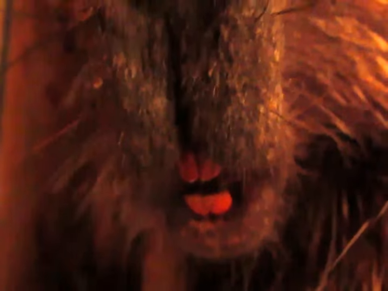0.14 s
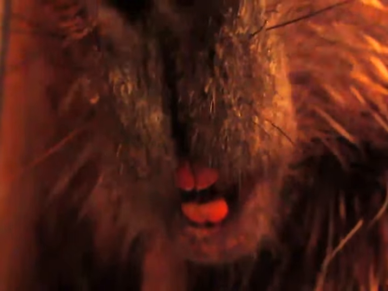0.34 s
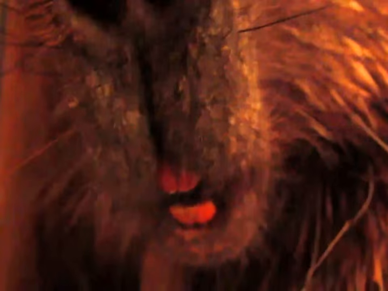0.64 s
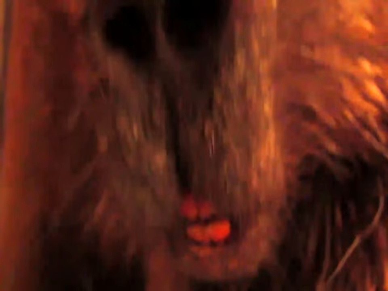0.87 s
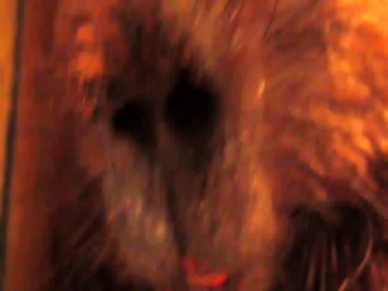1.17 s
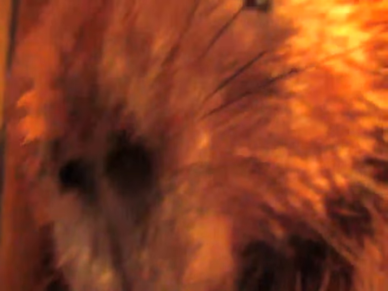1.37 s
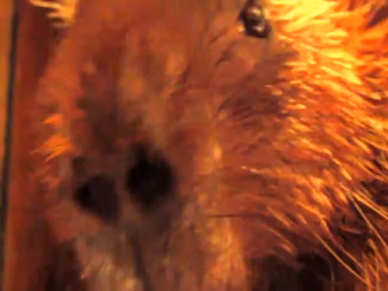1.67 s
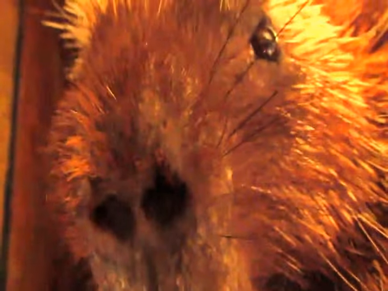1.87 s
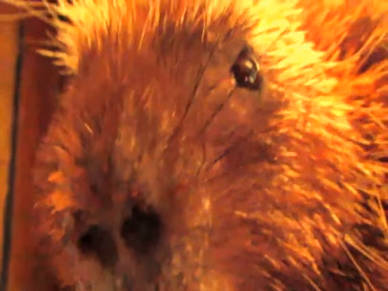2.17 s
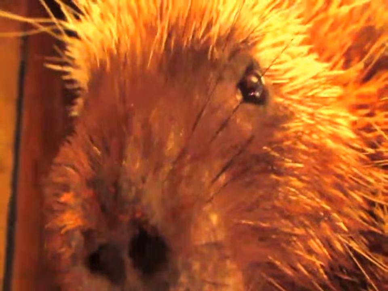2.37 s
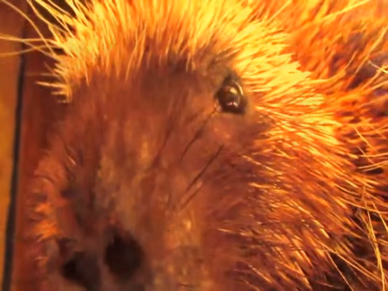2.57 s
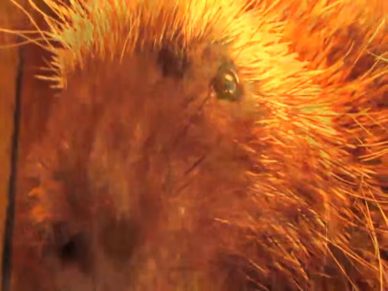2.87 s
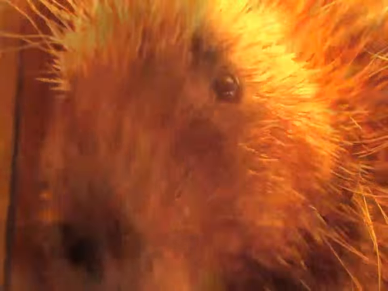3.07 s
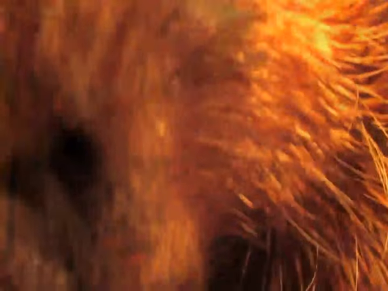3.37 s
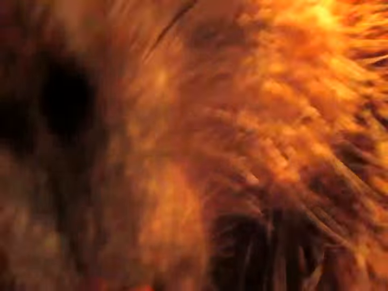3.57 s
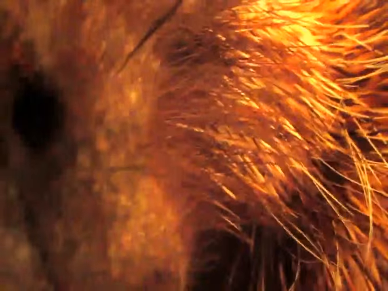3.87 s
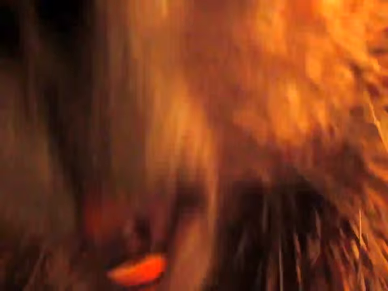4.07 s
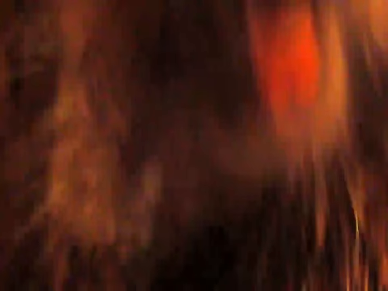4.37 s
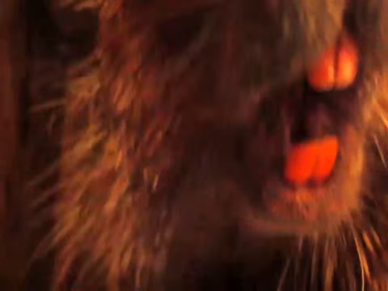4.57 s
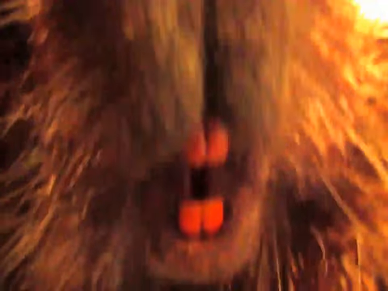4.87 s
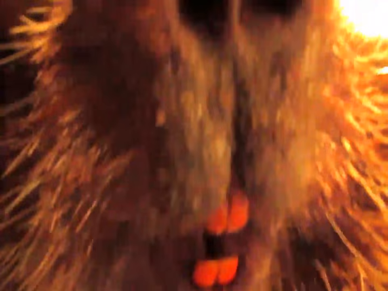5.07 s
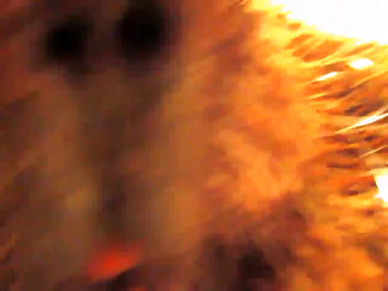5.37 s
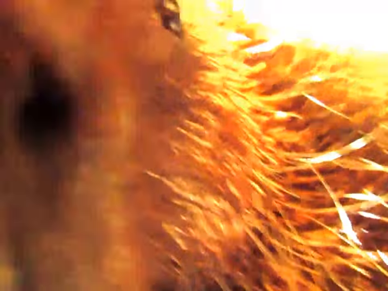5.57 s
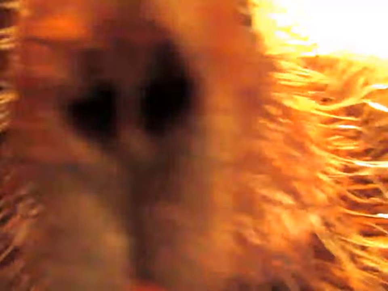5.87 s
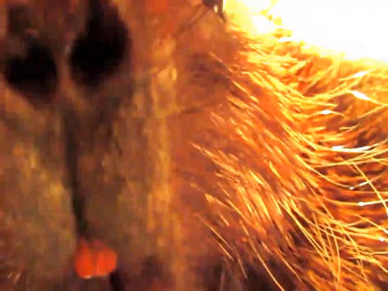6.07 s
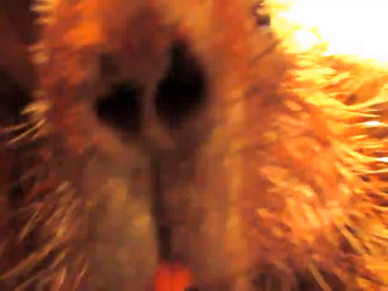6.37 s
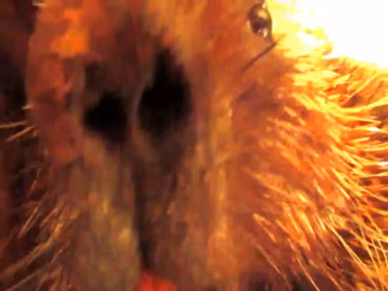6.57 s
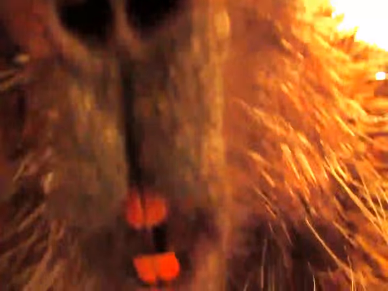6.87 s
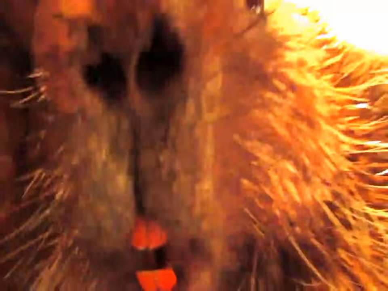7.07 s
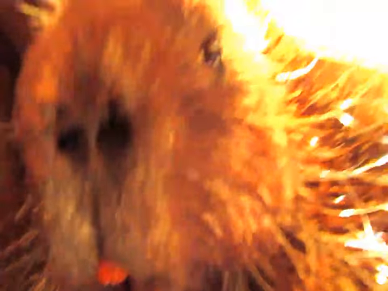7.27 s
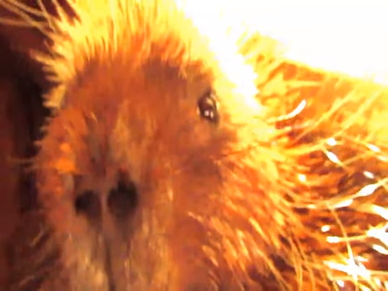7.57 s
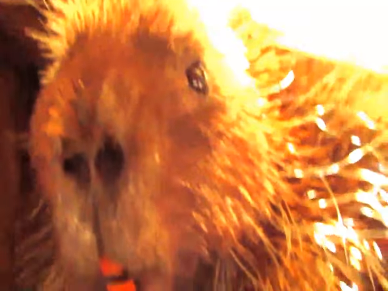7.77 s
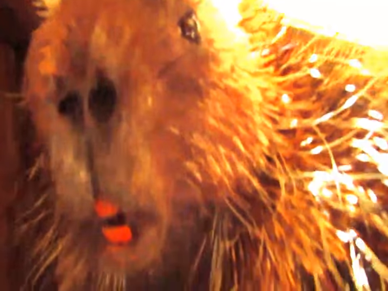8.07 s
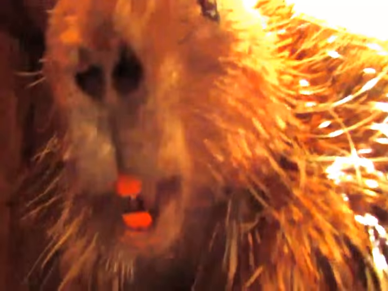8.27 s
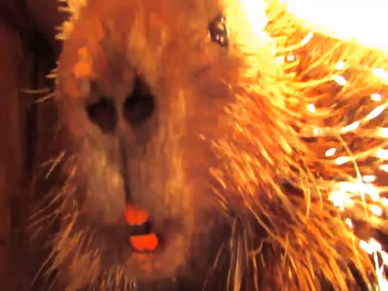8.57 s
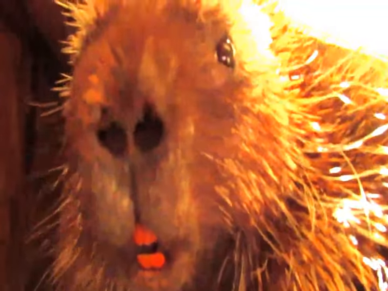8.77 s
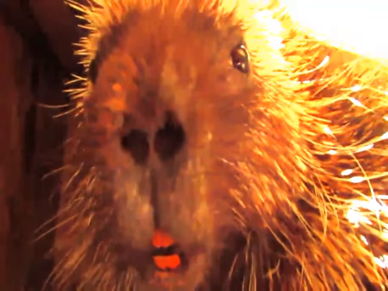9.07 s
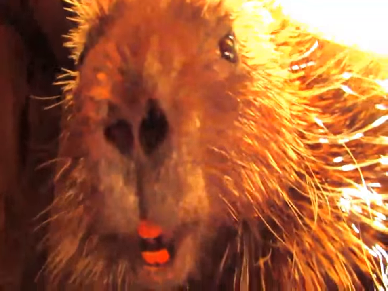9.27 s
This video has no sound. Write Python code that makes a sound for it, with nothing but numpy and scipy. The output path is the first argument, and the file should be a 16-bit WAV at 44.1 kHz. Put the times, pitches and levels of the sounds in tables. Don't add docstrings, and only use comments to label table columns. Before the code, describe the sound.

A porcupine close by gives short, sharp cries sliding from squeal to buzz, nose hisses before each, with shed hum and faint birdsong behind.

```python
import sys
import numpy as np
from scipy import signal
from scipy.fft import rfft, irfft, next_fast_len
from scipy.io import wavfile
from scipy.ndimage import uniform_filter1d, minimum_filter1d, map_coordinates

SR = 44100
rng = np.random.default_rng(int(sys.argv[2]) if len(sys.argv) > 2 else 0)


def generate_wav(sig):
    pcm = np.round(np.clip(np.atleast_2d(sig).T, -1, 1) * 32767).astype(np.int16)
    wavfile.write(sys.argv[1], SR, pcm)


def boost_factor(decibels):
    exponent = np.asarray(decibels, float) / 20
    return 10 ** exponent


N = 415863


def unit(x):
    return x / np.sqrt(np.mean(x ** 2) + 1e-20)


def along(points, hz):
    f, v = np.transpose(points)
    return np.interp(np.log(hz + 1), np.log(f + 1), v)


def curves(tables, edge):
    t = np.arange(N) / SR
    s, *cols = np.transpose(np.concatenate(tables))
    gate = 0
    for rows in tables:
        start, end = rows[0][0], rows[-1][0]
        gate = gate + np.interp(t, [start - edge, start, end, end + edge], [0, 1, 1, 0])
    return [np.interp(t, s, c) for c in cols] + [np.minimum(gate, 1)]


def eased(start, length, ease, *ends):
    u = np.linspace(0, 1, num=9)
    progress = 1 - (1 - u) ** ease
    return np.transpose([start + length * u] + [a + (b - a) * progress for a, b in ends])


def wobble(rate):
    knots = rng.standard_normal(int(N * rate / SR) + 4)
    return map_coordinates(knots, [np.arange(N) * rate / SR])


def filtered(x, response):
    m = next_fast_len(N + SR // 2)
    return irfft(rfft(x, m) * response(np.fft.rfftfreq(m, 1 / SR)), m)[..., :N]


def bumps(modes, f):
    return boost_factor(sum(db / (1 + (2 * (f - c) / w) ** 2) for c, w, db in modes))


def causal(gain):
    cepstrum = irfft(np.log(gain + 1e-6))
    half = len(cepstrum) // 2
    cepstrum[1:half] *= 2
    cepstrum[half + 1:] = 0
    return np.exp(rfft(cepstrum))


def tract(modes, base, top_hz):
    def response(f):
        rings = sum(boost_factor(db) ** 2 / (1 + (2 * (f - c) / w) ** 2) ** 2.1 for c, w, db in modes)
        step = boost_factor(along(base, f))
        gain = step * np.sqrt((1 + rings) / (1 + (f / top_hz) ** 6))
        return step * causal(gain / step) / np.sqrt(np.mean(gain ** 2))
    return response


def echoes(x, decay):
    hz, t, z = signal.stft(rng.standard_normal((2, SR // 2)), SR, nperseg=256)
    fading = z * boost_factor(-60 * t / along(decay, hz)[:, None])
    tail = signal.istft(fading, SR, nperseg=256)[1]
    tail = tail / np.linalg.norm(tail[0])
    return signal.fftconvolve(np.pad(x, (200, 0))[None], tail, axes=1)[:, :N]


# start t/s, end t/s, dip level/dB
DUCKS = [
    (0, 0.046, 2.5),
    (.43, 0.581, 7.5),
    (1.6, 1.722, 4.5),
    (2.385, 2.597, 5),
    (3.172, 3.418, -6),
    (4.223, 4.502, 16),
    (5.903, 6.0, 6),
    (6.69, 6.86, 7),
    (8.33, 8.42, -2),
]
HUM_DB, RECOVER_DB_PER_S, KNEE_DB = -55, 15.5, 4.5


def ducking():
    t = np.arange(N) / SR
    left = []
    for s, end, db in DUCKS:
        left.append(np.where(t >= s, db - RECOVER_DB_PER_S * np.maximum(t - end, 0), -99))
    return HUM_DB - KNEE_DB * np.logaddexp(0, np.max(left, axis=0) / KNEE_DB)


# f/Hz, level/dB
HUM_TONE = [(15, -40), (25, -20.5), (75, -4), (193, -9), (227, -8), (305, -5.5), (340, -6), (433, -7.5),
            (741, -10.5), (826, -12), (3530, -21.5), (3930, -26), (5430, -24.5), (11200, -33), (15500, -66)]
# f/Hz, width/Hz, level/dB
DRONE = [(109.13, 120, -4.5), (217, 25, 0), (720, 37, -1), (936, 150, -6.5)]
# f/Hz, likeness (-1 to 1)
HUM_ALIKE = [(60, 0.2), (180, -0.65), (550, -0.6), (1650, -0.45), (4970, -0.26), (15000, 0.28)]


def hum():
    z = signal.stft(rng.standard_normal((2, N)), nperseg=512)[2]
    field = uniform_filter1d(rng.standard_normal(z.shape[1:]), size=5, axis=0)
    field = uniform_filter1d(field, size=12, axis=1)
    pair = signal.istft(z * boost_factor(1.3 * unit(field)), nperseg=512)[1][:, :N]

    def response(f):
        turn = np.arccos(np.clip(along(HUM_ALIKE, f), -1, 1)) / 2
        drone = sum(boost_factor(db - 5.5) / (1 + (2 * (f - c) / w) ** 2) for c, w, db in DRONE)
        return (boost_factor(along(HUM_TONE, f)) + drone) * [np.cos(turn), np.sin(turn)]

    mid, side = filtered(pair, response)
    return boost_factor(ducking() + 0.5) * np.array([mid + side, mid - side]) / np.std(mid)


MOTOR_HZ = 57
# multiple of the shaft speed, level/dB
MOTOR_ORDERS = [(2, -64), (3, -74), (4, -67.5), (6, -74)]
# t/s, level/dB
MOTOR_RUN = [
    (0, -8),
    (.6, 2),
    (2.9, 2),
    (3.4, -13),
]


def motor():
    level_db, gate = curves([MOTOR_RUN], edge=.2)
    turn = 2 * np.pi * np.cumsum(MOTOR_HZ * (1 + 0.0038 * wobble(4.0))) / SR
    tones = sum(boost_factor(db + 3.2 * wobble(5.1)) * np.sin(k * turn) for k, db in MOTOR_ORDERS)
    return gate * boost_factor(level_db + ducking() - HUM_DB) * tones


# start t/s, length/s, from f/Hz, to f/Hz, level/dB
BIRDS = [(0, 0.029, 4920, 3800, -57.5), (0.025, 0.038, 3827, 3160, -58.5), (0.056, 0.14, 3120, 3400, -65.5),
         (1.131, 0.032, 5500, 4900, -61), (1.207, 0.023, 5700, 3750, -53), (1.231, 0.055, 3700, 2425, -56),
         (1.291, .045, 2790, 3500, -57), (1.359, .06, 4460, 4200, -59.5), (1.428, .042, 3840, 3730, -59.5),
         (1.719, 0.036, 2880, 2360, -65.5), (1.793, 0.014, 2850, 3600, -64),
         (1.804, 0.011, 3652, 3640, -57.5), (1.845, .012, 4500, 3830, -65),
         (1.856, 0.021, 3720, 3430, -60.5), (3.533, 0.039, 2200, 2000, -71),
         (3.595, .022, 2800, 3500, -56.5), (3.612, 0.028, 3510, 3540, -56.5),
         (3.65, 0.0022, 3480, 3390, -70.5), (4.001, 0.07, 3310, 2960, -53),
         (4.065, 0.086, 2960, 2950, -52.5), (6.133, .024, 3080, 3050, -69.5), (6.161, .04, 3070, 3060, -55),
         (6.202, 0.068, 3095, 3760, -51.5), (6.26, 0.022, 3715, 3646, -50),
         (6.287, .025, 3600, 3300, -57.5), (6.313, .022, 3750, 4600, -54), (6.336, .024, 4600, 5700, -68),
         (6.361, .03, 5730, 4600, -60.5), (6.39, .03, 4550, 4480, -60), (7.955, 0.028, 4700, 4550, -62),
         (8.001, 0.037, 4960, 4150, -51), (8.037, .03, 4150, 3500, -52), (8.067, .018, 3510, 2820, -48.5),
         (8.086, 0.035, 2830, 2600, -63), (8.143, 0.0068, 2790, 3140, -45), (8.149, .086, 3140, 3430, -55)]
# start t/s, length/s, level/dB
SWIFT = [
    (0.757, .43, -70),
    (6.255, .4, -66),
]
# f/Hz, time to fade by 60 dB/s
PORCH = [(2000, 0.098), (6000, .07)]
# f/Hz, time to fade by 60 dB/s
YARD = [(2000, 0.82), (5000, 0.36), (10000, .15)]
GLIDE_EASE, GLIDE_FADE_DB = 1.8, 4.5
THINS_DB = 14
ARCH_HZ, ARCH_DROP_HZ = 9030, 1000
ARCH_PEAK, ARCH_BEND, ARCH_SKEW = 0.51, 2.1, .7


def birds():
    song, waver = np.zeros(N), 1 + 0.009 * wobble(150)
    fade = np.outer(np.linspace(-1, 1, num=9) ** 2, [0, 0, GLIDE_FADE_DB])
    glides = []
    for s, length, a, b, db in BIRDS:
        glides.append(eased(s, length, GLIDE_EASE, (a, b), (db + 4.5, db + 1.5)) - fade)
    u = np.linspace(0, 1, num=15)
    arch = ARCH_HZ - ARCH_DROP_HZ * np.abs(u ** ARCH_SKEW / ARCH_PEAK - 1) ** ARCH_BEND
    arches = [np.transpose([s + length * u, arch, db + 0 * u]) for s, length, db in SWIFT]
    for notes in (glides, arches):
        hz, level_db, gate = curves(notes, edge=0.004)
        level_db = level_db - THINS_DB * np.clip(np.log2(hz / 3500), 0, .7)
        song += gate * boost_factor(level_db + 8.5) * np.sin(2 * np.pi * np.cumsum(hz * waver) / SR)
    song = song * boost_factor(2.5 * wobble(90))
    direct = boost_factor([[-5.5], [-6.5]]) * song
    return direct + boost_factor(-5) * echoes(song, PORCH) + boost_factor(-10.5) * echoes(song, YARD)


# t/s, peak level/dB
TICKS = [(0.1294, -48), (0.9894, -52.5), (2.894, -45), (3.8598, -52), (3.917, -44), (6.0997, -44),
         (7.148, -34.5), (7.221, -44), (7.3438, -46), (7.4987, -46), (8.141, -38)]


def ticks():
    out, t = np.zeros(N + SR), np.arange(400) / SR
    for s, db in TICKS:
        snap = boost_factor(db + 3.0 - 60 * t / 0.016) * rng.standard_normal(len(t))
        out[round(s * SR):][:len(t)] += snap
    return filtered(out[:N], lambda f: 1j * f / (1200 + 1j * f) * (6000 / (6000 + 1j * f)) ** 4)


# start t/s, length/s, f/Hz, width/Hz, level/dB
WHIFFS = [(1.44, .06, 1200, 251, -55.5), (1.49, .09, 3200, 500, -58.5), (1.51, 0.09, 5150, 304, -62.5),
          (2.312, 0.052, 3300, 300, -56), (3.4, .27, 420, 200, -58), (3.606, 0.2, 700, 800, -55.5),
          (4.084, 0.064, 2100, 913, -52.5), (4.27, 0.14, 1800, 448, -50), (4.25, .15, 10530, 6000, -48),
          (4.25, 0.16, 5500, 2500, -57), (4.3, 0.098, 1130, 200, -57.5), (4.329, 0.064, 290, 50, -49.5),
          (5.758, 0.1, 1600, 300, -56), (5.8, .07, 7200, 900, -59.5), (6.591, .065, 1750, 248, -58.5),
          (8.245, 0.082, 1600, 300, -58), (9.176, 0.053, 3200, 250, -53), (9.17, .045, 5800, 300, -59)]


def whiffs():
    out = np.zeros(N)
    for s, length, hz, width, db in WHIFFS:
        noise = rng.standard_normal(SR // 2)[:round(length * SR)]
        b, a = signal.iirpeak(hz, hz / width, SR)
        ring = unit(signal.lfilter(b, a, signal.lfilter(b, a, noise)))
        out[round(s * SR):][:len(ring)] += boost_factor(db) * ring * np.hanning(len(ring)) ** 0.34
    return out * boost_factor(3.6 * wobble(43))


# f/Hz, width/Hz, level/dB over the breath
NOSE = [(770, 140, 14.5), (1870, 90, 12), (3100, 130, 14.5), (5730, 290, 6), (7150, 300, 6.5),
        (9200, 660, 2)]
# f/Hz, width/Hz, level/dB over the pulse
OPEN = [(713, 41, 13), (1164, 100, 7.6), (1484, 150, 17), (1827, 150, 21), (2863, 91, 14), (3190, 250, 13),
        (3558, 190, 21), (4370, 560, 5.5), (4900, 6600, 6.2), (7320, 230, 4.6)]
# end t/s, length/s, level/dB, mouth opening (0-1)
HISSES = [
    (.388, .1, -50, .5),
    (1.572, 0.17, -51.5, 0.7),
    (2.339, 0.084, -52.5, 0.64),
    (3.124, .08, -50.5, 0.6),
    (4.145, 0.073, -41, .55),
    (5.86, 0.093, -52, 0.7),
    (6.644, 0.074, -51.5, 0.6),
    (8.294, .12, -49, 0.6),
    (9.199, 0.071, -50, 0.73),
]
HISS_SWELL_DB = 23
# start t/s, length/s, start level/dB, end level/dB, mouth opening (0-1)
SIGHS = [
    (3.638, 0.133, -68.5, -70, 0.2),
    (5.301, 0.16, -72, -61.5, 0.18),
    (5.444, 0.173, -65.5, -60, 0.1),
    (5.617, .07, -62, -74, 0.22),
    (5.736, .01, -75, -67, 0.9),
]


def air():
    swells = [[(s - length, db - HISS_SWELL_DB, mouth), (s, db, mouth)] for s, length, db, mouth in HISSES]
    sighs = [[(s, db, mouth), (s + length, end_db, mouth)] for s, length, db, end_db, mouth in SIGHS]
    level_db, mouth, gate = curves(sorted(swells + sighs), edge=.025)
    flow = gate * boost_factor(level_db + 9.0) * rng.standard_normal((2, N))
    mouth = np.clip(mouth, 0, 1)
    base = [(200, -10.5), (1500, -2.0), (5000, -5.0), (12000, -5.0), (14500, -20)]  # Hz, dB
    nose = filtered((1 - mouth) * flow[0], tract(NOSE, base, 14000))
    return nose + filtered(mouth * flow[1], tract(OPEN, base, 14000))


def pulses(hz, rough, jitter, scatter_db):
    turns = np.cumsum(hz) / SR
    whole = np.arange(1, int(turns[-1]))
    chance = rng.standard_normal((len(whole), 2))
    at = np.interp(whole, turns, np.arange(N))
    shake = np.minimum(rough[at.astype(int)], .15)
    at = at + jitter * shake * chance[:, 0] * SR / hz[at.astype(int)]
    at = np.clip(at, 9, N - 10)
    taps = at.astype(int)[:, None] + np.arange(-7, 9)
    away = taps - at[:, None]
    shape = np.sinc(away) * np.cos(away * np.pi / 17) ** 2
    size = boost_factor(scatter_db * shake * chance[:, 1])
    clicks = np.bincount(taps.ravel(), (shape * size[:, None]).ravel(), N) * np.sqrt(SR / hz)
    puffs = unit(np.exp(-3 * (turns % 1)) * rng.standard_normal(N))
    return np.sqrt(1 - rough) * clicks + np.sqrt(rough) * puffs


# f/Hz, level/dB under the effort
BREATH = [(3000, -60), (6000, -44.5), (9000, -38), (12000, -37.5), (14500, -40), (15800, -47.5)]
BREATH_GROWS = 1.3


def rushing_air(hz, level_db, upper_db, gate, soft):
    burst = np.exp(-2.2 * (np.cumsum(hz) / SR % 1))
    strength = boost_factor(BREATH_GROWS * (level_db + 15) + .6 * upper_db + 3 * wobble(81) - 2)
    noise = gate * np.clip(1 - soft, .1, 1) * burst * strength * rng.standard_normal(N)
    return filtered(noise, lambda f: boost_factor(along(BREATH, f)))


# f/Hz, level/dB
CHEST = [(140, -18), (185, -27.5), (235, -32.5), (305, -18), (420, -36.5), (580, -36), (700, -20.5),
         (900, -19)]
# f/Hz, width/Hz, level/dB
RIBS = [(166, 50, -7), (294, 28, -6.5)]


def chest_tone(hz, chest_db, gate):
    turn = 2 * np.pi * np.cumsum(hz) / SR
    first = boost_factor(along(CHEST, hz)) * np.sin(turn)
    second = boost_factor(along(CHEST, 2 * hz) - 11.0) * (hz < 450) * np.sin(2 * turn)
    tone = gate * boost_factor(chest_db - 5.0) * (first + second)
    ring = lambda f, c, w: 1j * f * w / (c * c - f * f + 1j * f * w)
    return filtered(tone, lambda f: 1 + sum(boost_factor(db + 9) * ring(f, c, w) for c, w, db in RIBS))


def flutter(x, delay, back):
    late = lambda f: np.exp(-2j * np.pi * f * delay)
    return filtered(x, lambda f: (late(f) - back) / (1 - back * late(f)))


# f/Hz, width/Hz, level/dB (hollows under 0)
POCKETS = [
    [(1150, 220, -3), (2600, 200, -3.5), (3150, 200, -6.5), (3930, 200, -4.5), (4400, 400, 0.5),
     (6800, 200, -5)],
    [(1250, 250, 1), (2100, 270, -0.5), (2600, 200, -5), (4850, 350, 5.5), (5900, 500, -8.5),
     (8000, 300, 4)],
    [(2100, 250, -4), (2650, 180, -4.5), (3820, 160, -4), (6070, 490, -7), (7260, 300, -1.5),
     (8700, 220, -6.5)],
    [(2500, 300, 5), (2630, 300, -8.5), (5850, 300, 8.5), (5800, 620, -7.5), (6650, 180, 4),
     (8300, 320, -4.5)],
    [(750, 140, 2.5), (2050, 400, 3), (2800, 300, 0.5), (5400, 600, -0.5), (6860, 500, -4.5),
     (8800, 490, 5.5)],
    [(2241, 200, -10), (2600, 160, 3.5), (3700, 200, -2.5), (4000, 200, -8), (4500, 400, 2),
     (7193, 410, -9.5)],
    [(2250, 260, -9.5), (2800, 300, 2), (4000, 110, -3.5), (4170, 460, 5), (5700, 400, 5), (6200, 490, -5)],
    [(1090, 290, 5.5), (1800, 280, 3.5), (2873, 283, 6), (4500, 210, 1.5), (6446, 600, -5), (8440, 800, -5)],
    [(1140, 300, 2), (1730, 140, 7.5), (2200, 490, -3), (3200, 200, 3), (3700, 230, -10.5), (4100, 200, 6)],
]
# f/Hz, width/Hz, level/dB
SQUEALS = [
    [(2920, 230, -5.5), (5840, 400, -7.5), (7300, 600, -7)],
    [(2640, 300, -5), (4600, 300, -12.5), (6200, 900, -10.5)],
    [(1362, 300, -2), (4800, 300, -5.5), (6150, 500, -6.5)],
    [(1340, 300, 1.5), (3978, 400, 2.5), (6000, 400, -7)],
    [(4370, 400, -3), (5300, 500, -5), (9800, 2000, 6.5)],
    [(2870, 300, 0.5), (4700, 700, 3.5), (7490, 1200, 4)],
    [(2000, 280, 3), (4600, 420, -11.5), (6900, 900, -7)],
    [(3480, 350, 0), (4600, 350, 3), (5500, 600, -9)],
    [(1446, 300, -4), (4400, 300, -3), (8350, 1200, -8)],
]
# f/Hz, width/Hz, level/dB
HOLLOWS = [(470, 250, -1), (424, 68, -7.5)]
SQUEAL_FROM_HZ, SQUEAL_BLEND_HZ = 610, 90


def pockets(throat, hz):
    out, size = np.zeros(N + SR), 2 ** 15
    f = np.fft.rfftfreq(size, 1 / SR)
    high = np.clip((hz - SQUEAL_FROM_HZ) / SQUEAL_BLEND_HZ, 0, 1)
    shape = lambda modes: causal(bumps(modes, f))
    for call, modes, squeal in zip(sorted(YIPS + WHINES + YELP[:1]), POCKETS, SQUEALS):
        at = round((call[0][0] - .05) * SR)
        part = slice(at, at + size // 2 + size // 8)
        buzzing = rfft((1 - high[part]) * throat[part], size)
        squealing = rfft(high[part] * throat[part], size) * shape(squeal)
        out[at:at + size] += irfft((buzzing + squealing) * shape(modes + HOLLOWS), size)
    return out[:N]


# t/s, pulse rate f/Hz, effort level/dB
YIPS = [
    [(0.403, 726.8, -9), (0.429, 696.4, -8), (0.447, 543, -15), (0.46, 425.5, -17), (0.478, 312.7, -16.5),
     (0.506, 246.7, -23), (0.524, 162.9, -35), (0.55, 140, -61.5)],
    [(1.581, 672, -19), (1.6, 645.1, -14.5), (1.61, 591.7, -9.5), (1.63, 422.7, -14.5), (1.64, 360, -16),
     (1.654, 300.3, -26), (1.672, 239.2, -40), (1.70, 160, -57.5)],
    [(5.877, 724, -10), (5.901, 684.1, -11), (5.92, 505.6, -11.5), (5.928, 435.6, -27),
     (5.936, 313.6, -28.5), (5.95, 231.3, -33), (5.97, 160, -61.5)],
    [(6.656, 687.3, -12), (6.682, 649.7, -12), (6.696, 573.9, -8.5), (6.72, 410.9, -13.5),
     (6.744, 313, -15), (6.775, 247.7, -20), (6.803, 171.5, -31), (6.83, 141.8, -58.5)],
    [(8.312, 592, -18), (8.326, 566.5, -13), (8.344, 384.3, -16.5), (8.354, 309.7, -25.5),
     (8.372, 270.2, -43), (8.395, 242.6, -48)],
]
# t/s, pulse rate f/Hz, effort level/dB
WHINES = [
    [(2.353, 691.6, -16.5), (2.369, 682.1, -12), (2.395, 577.1, -15), (2.43, 364.8, -16),
     (2.444, 313.6, -18), (2.486, 252.1, -20.5), (2.525, 220.5, -25), (2.549, 166.3, -37.5),
     (2.57, 140, -62.5)],
    [(3.14, 698.3, -21), (3.166, 631.9, -14), (3.19, 471.7, -16.5), (3.21, 326.1, -20),
     (3.238, 239.2, -24.5), (3.285, 238.2, -24.5), (3.352, 203.9, -26.5), (3.378, 171, -41.5),
     (3.4, 149.7, -56.5)],
    [(9.221, 732, -7.5), (9.247, 706, -7.5), (9.27, 573.2, -10), (9.291, 395.5, -14), (9.313, 303.3, -19.5),
     (9.346, 245.2, -22), (9.388, 247, -22.5), (9.45, 208.6, -26.5)],
]
# t/s, pulse rate f/Hz, effort level/dB
YELP = [
    [(4.152, 849.6, -35), (4.166, 861, -11), (4.18, 894.7, -9.5), (4.196, 909.7, -8), (4.205, 900, -6.5),
     (4.211, 836.7, -7), (4.2145, 811.7, -8.5)],
    [(4.2155, 788.7, -6.5), (4.226, 641.4, -8), (4.239, 407.9, -20.5), (4.253, 270.5, -30),
     (4.278, 190.1, -41), (4.32, 174.4, -44.5), (4.334, 147.6, -47), (4.398, 135.8, -55.5),
     (4.412, 127.1, -73)],
]
# mouth at start, mouth at end (0 shut, 1 open, 2 wide), brightness level/dB, chest level/dB
POSE = [
    (0.085, 0.058, -1.5, 1),
    (0.22, 0.11, -1, 4),
    (.12, .1, 1, 2),
    (.12, .07, 3, 4.5),
    (3, 3.2, 4.5, 8.5),
    (2.1, 1.6, 2, 2),
    (.9, 1.3, -3.5, 1.5),
    (0.66, 1.4, -2, -3.5),
    (0.58, 0.5, -5, 6),
    (0.68, 0.52, 2, 1.5),
]
ROUGH = [
    (0, .05),
    (.02, .04),
    (.005, .022),
    (.008, .022),
    (.03, .02),
    (.0, .3),
    (0, .12),
    (.01, .04),
    (.03, .07),
    (.005, .02),
]
# f/Hz, level/dB
BRIGHT = [(180, -6), (240, -1), (310, 1.5), (420, 4.5), (560, 1), (690, 0), (730, -8.5), (850, -13.5),
          (910, -7.5)]
# f/Hz, level/dB
SNAP = [(100, -28.5), (300, -13), (1000, -1.5), (2500, 5), (5500, -4.5), (7000, -8), (9000, -17),
        (12000, -20.5), (15000, -29.5)]
# f/Hz, width/Hz, level/dB over the pulse
SHUT = [(747, 52, 6), (1206.7, 240, 14.5), (1644, 270, 11.5), (2063, 230, 10), (2960, 130, 12),
        (3279, 200, 18), (3640, 120, 12.5), (4384, 310, 11), (5270, 1100, 7.5), (7290, 150, 11.5)]
# f/Hz, width/Hz, level/dB over the pulse
WIDE = [(970, 200, 1.3), (1160, 62, 2.9), (1726, 190, 22), (2800, 67, 4.9), (3680, 330, 11),
        (4430, 1200, 11), (5000, 400, 8.6), (7430, 1900, 12)]
POSE_EASE = 4.2
CHEST_FOLLOWS = .6
SOFT_DB, SOFT_FROM_HZ = -8.5, 520
UNEVEN_DB = 1.6


def cries():
    calls = sorted(YIPS + WHINES + YELP)
    hz, level_db, gate = curves(calls, edge=.0055)
    hz = uniform_filter1d(hz, size=500)
    poses = []
    for call, (start, end, bright, chest), rough in zip(calls, POSE, ROUGH):
        length = call[-1][0] - call[0][0]
        ends = (start, end), rough, (bright, bright), (chest, chest)
        poses.append(eased(call[0][0], length, POSE_EASE, *ends))
    mouth, rough, bright_db, depth_db, _ = curves(poses, edge=1)
    upper_db = bright_db + along(BRIGHT, hz)
    chest_db = depth_db + CHEST_FOLLOWS * level_db

    glide = uniform_filter1d(np.abs(np.gradient(np.log(hz))) * SR, size=400)
    source = pulses(hz, np.clip(rough + .0004 * glide, 0, .95), jitter=.1, scatter_db=10)
    drive = gate ** 2 * boost_factor(level_db + 4.0 + UNEVEN_DB / 2 * wobble(90)) * source

    upper = lambda f: 1 / (1 + (2600 / (f + 1)) ** 8)
    treble = drive * np.roll(gate, shift=130) ** 2 * boost_factor(upper_db + UNEVEN_DB * wobble(110))
    drive = filtered(drive, lambda f: 1 - upper(f)) + filtered(treble, upper)
    tight = np.clip((hz - SOFT_FROM_HZ) / 120, 0, 1) * np.clip(2.6 - mouth, .3, 1)
    soft = 1 - boost_factor(SOFT_DB * tight)
    drive = drive - filtered(soft * drive, lambda f: np.clip((f - 5600) / 900, 0, 1))

    throat = 0
    for k, (modes, top_hz) in enumerate([(SHUT, 10500), (OPEN, 10000), (WIDE, 10000)]):
        share = np.clip(1 - np.abs(np.clip(mouth, 0, 2) - k), 0, 1)
        throat = throat + filtered(share * drive, tract(modes, SNAP, top_hz))
    voice = pockets(flutter(throat, delay=1 / 765, back=0.76), hz)

    puff = filtered(gate * boost_factor(level_db - 23.5) * rng.standard_normal(N), lambda f: 1 / (1 + (f / 130) ** 4))
    return puff + rushing_air(hz, level_db, upper_db, gate, soft) + voice + chest_tone(hz, chest_db, gate)


# f/Hz, phase/radians
LEAD = [(0, -4), (1720, 0.58), (2840, 0.5), (3190, 0.5), (4220, 0.86), (7060, 0.55), (7320, 3),
        (7840, 11.5), (8530, 9.5), (15400, 4.5)]
# f/Hz, level/dB
LEAN = [(100, 1), (290, 6), (800, -0.5), (1250, 0.26), (2000, -1.5), (3200, 0.13), (6000, 2), (15000, -1)]


def ports(x):
    half = lambda f: boost_factor(along(LEAN, f) / 2) * np.exp(.5j * np.clip(along(LEAD, f), 0, 1.1))
    return filtered(x, lambda f: np.array([half(f), 1 / half(f)]))


# f/Hz, time to fade by 60 dB/s
SNOUT = [(500, 0.017), (5000, .025), (12000, 0.006)]
# f/Hz, time to fade by 60 dB/s
SHED = [(200, .12), (1500, 0.12), (5000, 0.32), (12000, 0.046)]


def scene():
    background = hum() + motor() * boost_factor([[2], [-2.5]]) + birds()
    animal = ticks() + whiffs() + air() + cries()
    room = boost_factor(-14) * echoes(animal, SNOUT) + boost_factor(-35.0) * echoes(animal, SHED)
    return background + room + ports(animal)


def top_cut(x):
    return signal.sosfilt(signal.butter(12, 21500, fs=SR, output="sos"), x)


# f/Hz, width/Hz, level/dB
GRILLE = [(3970, 130, -5), (8100, 160, -7.5)]


def record(dry):
    dry = filtered(dry, lambda f: causal(bumps(GRILLE, f)))
    room_left = np.minimum(1, 1.3 / (np.abs(dry).max(axis=0) + 1e-9))
    limited = dry * uniform_filter1d(minimum_filter1d(room_left, size=180), size=180)
    shaved = limited / (1 + np.abs(limited / .99) ** 16) ** (1 / 16)
    narrow = filtered(shaved, lambda f: (f < 15800) * 1j * f / (40 + 1j * f) / (1 + (f / 15600) ** 8))
    clipped = narrow / (1 + np.abs(narrow) ** 24) ** (1 / 24)
    return top_cut(clipped)


dry = scene()
out = record(dry)
generate_wav(out)
```